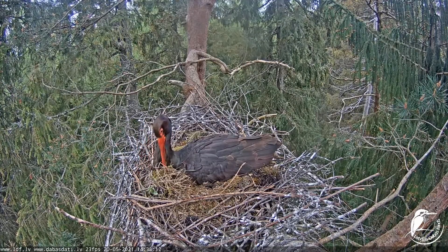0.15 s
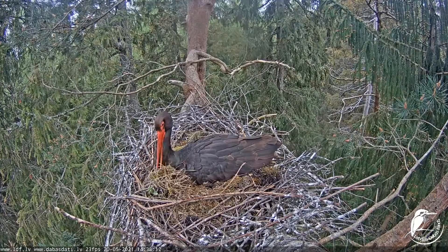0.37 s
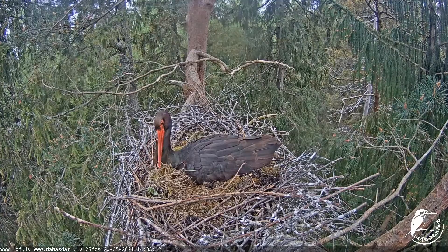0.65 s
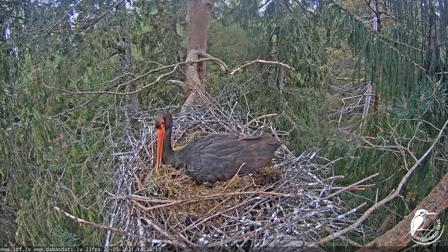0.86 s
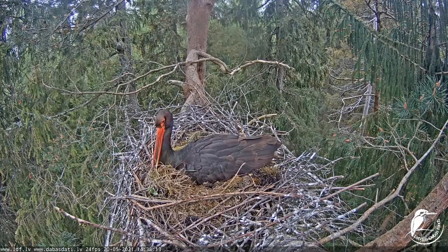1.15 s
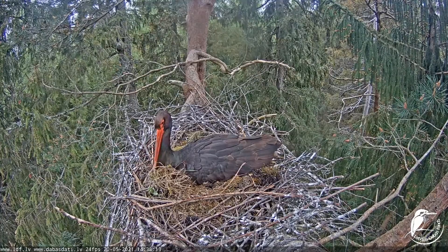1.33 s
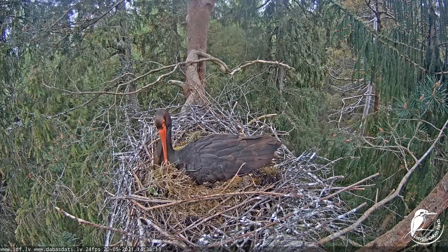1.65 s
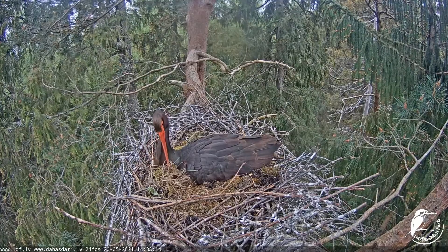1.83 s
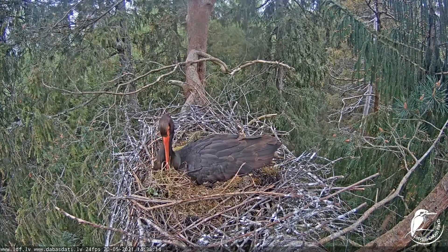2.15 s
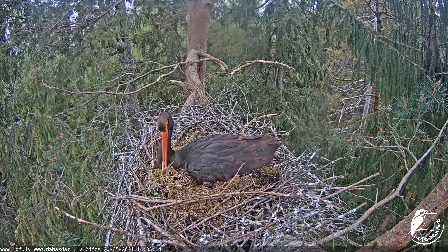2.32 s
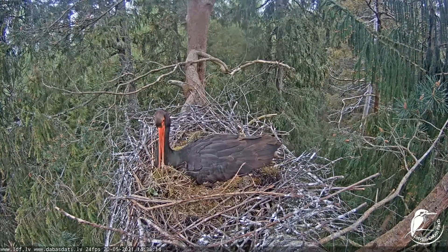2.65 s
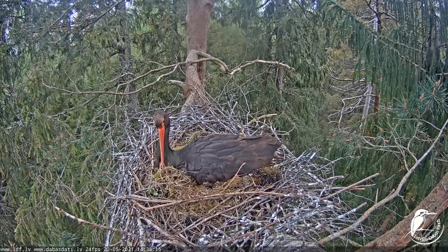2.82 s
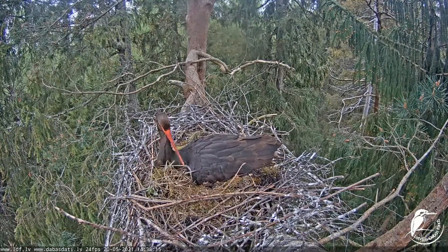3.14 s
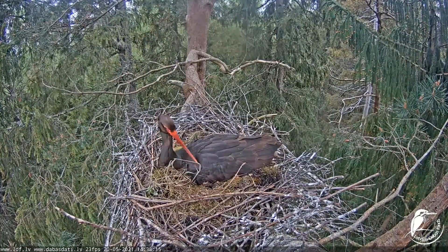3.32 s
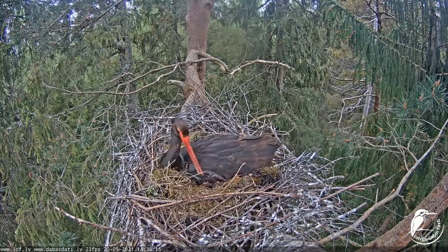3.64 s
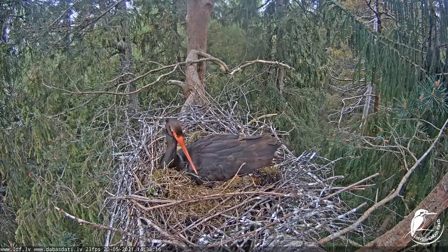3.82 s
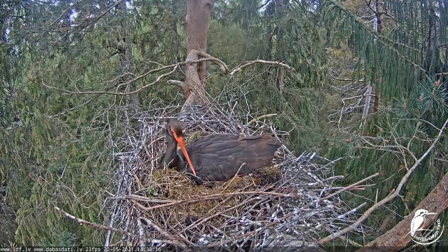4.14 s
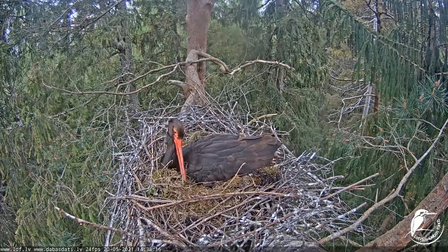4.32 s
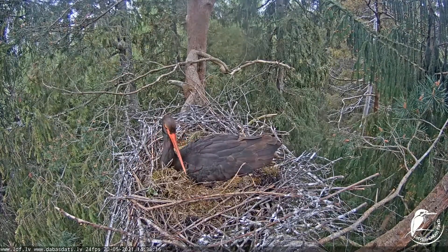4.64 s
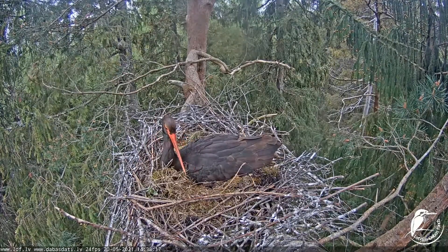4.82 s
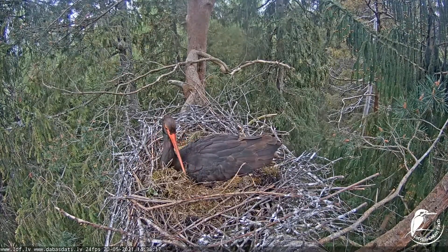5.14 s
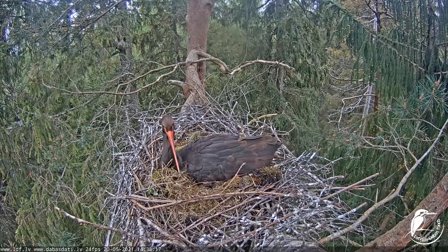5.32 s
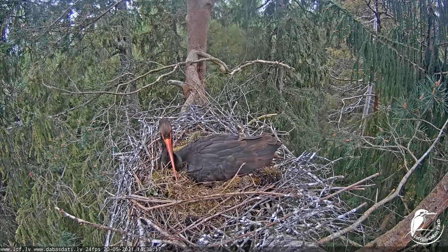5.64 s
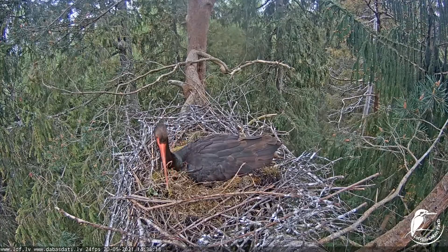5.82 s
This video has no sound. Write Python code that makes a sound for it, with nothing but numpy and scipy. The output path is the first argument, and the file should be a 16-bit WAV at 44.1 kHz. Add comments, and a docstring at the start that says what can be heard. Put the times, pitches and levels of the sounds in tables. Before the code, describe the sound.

Quiet forest ambience with a low uneven rumble and soft hiss, faint distant twittering, and small birds giving short whistles and chirps.

```python
"""Quiet forest from high in a tree

A low rumble swells and fades under smooth hiss with a hump near 2-3 kHz, the blurred chorus of far
songbirds: both are coloured noise, the rumble with narrow noise bands on set pitch and level curves.
Far twitter, nearer whistles and chirps are fluttering sines with sparse echoes from the trunks; two twig
snaps are ringing wood modes. A cheap microphone input adds a constant offset and one brief dropout."""
import sys
import numpy as np
from scipy import signal
from scipy.io import wavfile
from scipy.ndimage import uniform_filter1d

SR = 44100
rng = np.random.default_rng(int(sys.argv[2]) if len(sys.argv) > 2 else 0)


def store_pcm(level_fs):
    """Save levels as 16-bit WAV."""
    pcm = np.round(np.clip(level_fs, -1, 1) * 32767).astype(np.int16)
    wavfile.write(sys.argv[1], SR, np.atleast_2d(pcm).T)


def elevation(decibels):
    """Turn decibel levels (scalar or array-like) into linear amplitude ratios."""
    levels = np.asarray(decibels, float)
    return 10 ** (levels / 20)


N = 263718  # length in samples


def evened(x):
    """Scales to rms 1."""
    return x / np.sqrt(np.mean(x ** 2) + 1e-20)


def add(mix, start_s, sound):
    """Mixes a sound in at a time, cut off at the end of the mix."""
    part = mix[round(start_s * SR):][:len(sound)]
    part += sound[:len(part)]


def along(rows):
    """A level curve of (s, dB) as a gain for every sample."""
    s, db = np.transpose(rows)
    return elevation(np.interp(np.arange(N) / SR, s, db))


def noise(spectrum, size, patchy_db, patch_bins, patch_frames):
    """Random short-time spectra of a given colour, with drifting louder and softer patches; rms 1."""
    frames = 4 * N // size + 5
    bin_hz = np.fft.rfftfreq(size, 1 / SR)
    real, imag, patches = rng.standard_normal((frames, len(bin_hz), 3)).T
    patches = uniform_filter1d(patches, patch_bins, axis=0)
    patches = evened(uniform_filter1d(patches, patch_frames, axis=1))
    hz, db = np.transpose(spectrum)
    colour_db = np.interp(np.log(bin_hz + 1), np.log(hz + 1), db)[:, None]
    spectra = (real + 1j * imag) * elevation(colour_db + patchy_db * patches)
    _, sound = signal.istft(spectra, nperseg=size, noverlap=3 * size // 4)
    return evened(sound[:N])


def tone(hz, rough, flutter_hz):
    """A sine on a pitch curve whose level and phase flutter; fully rough, it is a narrow band of noise."""
    settling = 2000  # samples for the filter to settle, thrown away
    real, imag = rng.standard_normal((len(hz) + settling, 2)).T
    lowpass = signal.butter(2, flutter_hz, fs=SR, output="sos")
    flutter = signal.sosfilt(lowpass, real + 1j * imag)[settling:]
    flutter /= np.sqrt(np.mean(abs(flutter) ** 2))
    carrier = np.exp(2j * np.pi * np.cumsum(hz) / SR)
    return ((1 - rough + rough * flutter) * carrier).imag


def rumble():
    """Lumpy low noise, and narrow noise bands with set pitch and level curves plus a slight random wander."""
    # colour of the low noise, relative: f/Hz, density/dB per Hz
    low_colour = [(15, -31.5), (25, -8), (27, -4), (32, -3), (125, -5.5), (193, -7.5), (450, -28.5),
                  (580, -68.5), (990, -120)]
    # its swell, before a trim of -4.5 dB: t/s, level/dB
    swell = [(0, -47.5), (.8, -47), (1.9, -45.5), (3.3, -50), (3.9, -45), (4.3, -49), (5.2, -50.5),
             (5.55, -42.5), (5.98, -47.5)]
    # set curves, one list for each narrow band: t/s, centre f/Hz, level/dB (a slight wander is added)
    drones = [
        [(0, 112, -51), (.2, 113, -46), (.6, 118, -52), (1.4, 128, -51), (1.9, 127, -46), (2.4, 126, -47.5),
         (3.2, 122, -56), (4.3, 100, -62), (4.8, 104, -51.5), (5.25, 122, -56), (5.6, 129, -46.5),
         (5.98, 126, -55.5)],
        [(0, 197, -53), (.3, 196, -54), (.55, 194, -55.5), (1, 192, -47.5), (1.15, 181.8, -54),
         (1.4, 168, -55.5), (3.2, 178, -58), (3.95, 182, -52), (4.2, 178, -61.5), (5.6, 158, -50.5),
         (5.98, 162, -57.5)],
        [(0, 46.03, -52), (.5, 53.87, -49.5), (1, 56, -56.5), (3.5, 56.74, -53.5), (4.8, 53, -59),
         (5.98, 50.79, -54.5)],
        [(0, 81.7, -52.5), (.75, 78.43, -52), (1.3, 85.46, -52), (1.9, 85.87, -54), (3, 84.43, -53),
         (4.3, 84.17, -59.5), (5.3, 84, -56), (5.98, 84.25, -66)],
        [(0, 254.7, -60.5), (2, 255.3, -64), (2.4, 254.9, -56), (3.4, 256, -63.5), (4, 253.9, -59),
         (5.2, 255, -59.5), (5.5, 255.3, -53), (5.98, 254.2, -59.5)],
    ]
    # nominal width of each narrow band: f/Hz
    drone_widths = [26.5, 25.73, 19.4, 18.2, 51.9]
    wander_db, slowest_hz, fastest_hz = 1.5, .4, 2.5  # slight random wander of level: rms and rates
    t = np.arange(N) / SR
    low_noise = noise(low_colour, size=4096, patchy_db=1.5, patch_bins=3, patch_frames=8)
    out = along(swell) * elevation(-4.5) * low_noise
    for rows, width_hz in zip(drones, drone_widths):
        s, hz, db = np.transpose(rows)
        rates_hz = np.geomspace(slowest_hz, fastest_hz, 12)
        wander = evened(sum(np.sin(2 * np.pi * (rate * t + rng.random())) for rate in rates_hz))
        band = evened(tone(np.interp(t, s, hz), rough=0.929, flutter_hz=width_hz / 2))
        out += elevation(np.interp(t, s, db) + wander_db * wander) * band
    return out


def air():
    """Steady air, far chorus and microphone hiss as one smooth noise with a hump near 2-3 kHz."""
    # colour, relative: f/Hz, density/dB per Hz
    air_colour = [(180, -20.5), (300, -3), (373, -6.5), (485, -8.5), (630, -9), (859, -12), (1190, -14.5),
                  (1640, -14.5), (2240, -7.5), (2830, -13.5), (3790, -22.5), (11600, -25), (12100, -26),
                  (15700, -57.5), (22000, -120)]
    level_db = -55.5  # rms
    return elevation(level_db) * noise(air_colour, size=1024, patchy_db=0.8378, patch_bins=8, patch_frames=10)


def twitter():
    """Many faint, hoarse glides from birds too far away to tell apart, livelier at some times."""
    # how lively the far birds are, as a gain on all of them: t/s, level/dB
    lively = [(0, 0), (1.5, 14.5), (3, 13.5), (4, 4.5), (5.98, -13)]
    out = np.zeros(N)
    for place, length, pitch, glide, softness in rng.random((150, 5)):
        count = round((0.02274 + 0.0367 * length) * SR)
        start_hz = 1850 + 1900 * pitch ** 1.6
        hz = start_hz * np.linspace(1, .88 + 0.2453 * glide, count)
        db = -66 - 8 * pitch - 5 * softness  # higher notes lose more on the way
        note = np.hanning(count) * tone(hz, rough=0.41, flutter_hz=120)
        add(out, place * N / SR, elevation(db) * note)
    return along(lively) * out


def glides(rows, rough, flutter_hz):
    """Short notes that slide straight from one pitch to another, with soft ends and a flutter."""
    out = np.zeros(N)
    for start_s, length_s, start_hz, end_hz, db in rows:
        count = round(length_s * SR)
        hz = np.linspace(start_hz, end_hz, count)
        note = np.sqrt(.5) * evened(tone(hz, rough, flutter_hz))  # the rms of a sine of peak 1
        add(out, start_s, elevation(db) * signal.windows.tukey(count, .6) * note)
    return out


def whistles():
    """Held notes that settle in pitch, pulse, and fall to a soft tail."""
    # rms level at the loudest moment, before the pulsing:
    # t/s, length/s, start f/Hz, settled f/Hz, level/dB, share of flutter (0-1)
    held_notes = [(1.025, .5, 2090, 2180, -52, .28), (2.19, .46, 2260, 2300, -58, .6),
                  (3.9, .72, 3240, 3050, -61, .36), (4.27, .27, 3275, 3255, -69, .4),
                  (5.86, .2, 2330, 2330, -59, .45)]
    settle, peak_at, tail_at = .12, .37, .46  # shares of the length: settling time, loudest, tail begins
    start_db, tail_db, end_db = -6, -7, -12  # against the loudest moment
    throb_hz, throb_depth = 24, .35  # the held note pulses
    out = np.zeros(N)
    for start_s, length_s, start_hz, settled_hz, db, rough in held_notes:
        t = np.arange(0, length_s, 1 / SR)
        hz = settled_hz + (start_hz - settled_hz) * np.exp(-t / (settle * length_s))
        note = evened(tone(hz, rough, flutter_hz=90))
        shape_db = np.interp(t / length_s, [0, peak_at, tail_at, 1], [start_db, 0, tail_db, end_db])
        throb = 1 - throb_depth * np.cos(2 * np.pi * throb_hz * t)
        add(out, start_s, elevation(db + shape_db) * throb * note * signal.windows.tukey(len(t), .1))
    return out


def birds():
    """Nearer whistles and short glides, fluttering as many paths through the leaves interfere."""
    # the clearest short chirps, level as the peak of a steady sine:
    # t/s, length/s, start f/Hz, end f/Hz, level/dB
    chirps = [(.71, .045, 2220, 2190, -55.5), (.88, 0.035, 2420, 2512, -56.5),
              (1.876, 0.0354, 2164, 2389, -56), (1.969, 0.0408, 2580, 2800, -61),
              (2.018, 0.043, 3110, 3122, -66.5), (2.04, 0.05, 2050, 2090, -59.5),
              (2.073, .022, 2640, 2913, -64), (2.97, .061, 2600, 2550, -59),
              (3.028, .027, 2389, 2972, -54.5), (3.07, 0.016, 2627, 2352, -51),
              (3.71, 0.053, 2700, 2890, -57), (3.34, 0.049, 2510, 3183, -59),
              (3.638, 0.0496, 3408, 3210, -63), (3.68, .03, 2660, 2340, -57),
              (3.989, .042, 2245, 2205, -52.5), (4.46, 0.079, 4190, 3775, -68.5),
              (4.63, 0.0286, 2071, 2432, -54), (4.64, .087, 4054, 3800, -71),
              (4.862, .027, 2672, 2107, -51.5), (4.899, .055, 1867, 1750, -59.5),
              (4.91, 0.054, 3575, 3875, -67.5), (4.995, .036, 2042, 2484, -51),
              (5.094, 0.0616, 3625, 3795, -67), (5.217, .04, 2825, 3275, -60),
              (5.248, 0.0315, 3280, 2925, -60), (5.269, .04, 3770, 3740, -62.5),
              (5.39, 0.0606, 1945, 1775, -61), (5.425, .072, 3297, 3505, -64.5),
              (5.49, 0.107, 2420, 2327, -57.5), (5.54, 0.071, 3585, 2725, -58.5),
              (5.663, 0.064, 3250, 3487, -64.5), (5.76, 0.0406, 3300, 2754, -58.5),
              (5.8, 0.0424, 3478, 3455, -62), (5.89, .045, 3380, 3460, -65)]
    # hoarse, blurred notes, same columns: t/s, length/s, start f/Hz, end f/Hz, level/dB
    rasps = [(1.433, 0.11, 3340, 3487, -63.5), (2.47, .059, 3275, 3280, -61.5),
             (2.542, .04, 3400, 3079, -61), (3.66, 0.09, 3480, 3700, -64), (3.195, .077, 2000, 2143, -58),
             (3.81, 0.0642, 2480, 2262, -52.5), (4.174, 0.06154, 2775, 2668, -55),
             (4.239, 0.0388, 2837, 2620, -57), (4.685, .115, 3475, 3275, -64)]
    clear = glides(chirps, rough=.22, flutter_hz=90)
    hoarse = glides(rasps, rough=.65, flutter_hz=230)
    return whistles() + clear + hoarse


def trunks(x, t60=0.45):
    """Scattered echoes from the trees: sparse taps of random sign that die away by 60 dB in t60 seconds."""
    first, spacing = 400, 22  # samples: delay before the first echo, one echo in each slot
    taps = np.zeros(SR)
    at = np.arange(first, SR - spacing, spacing)
    signs = rng.choice([-1., 1.], len(at))
    taps[at + rng.integers(0, spacing, len(at))] = signs * elevation(-60 * at / SR / t60)
    return signal.fftconvolve(x, taps / np.linalg.norm(taps))[:N]


def twigs():
    """A crack and a second one three milliseconds later, with crackle around, ring the modes of dry wood."""
    # the snaps: t/s, peak level/dB
    snaps = [(2.4935, -42), (2.802, -38.5)]
    # modes of the wood, levels relative: f/Hz, level/dB, time to fall 60 dB/s
    wood_modes = [(800, -9, .015), (1450, -8, .014), (1950, -5, .012), (2500, 0, .016), (2900, -2, .014),
                  (3500, -9, .01)]
    out = np.zeros(N)
    t = np.arange(1000) / SR
    ring = sum(elevation(db - 60 * t / t60) * np.sin(2 * np.pi * hz * t) for hz, db, t60 in wood_modes)
    ring *= 1 - np.exp(-t / .0003)  # soft onset keeps the treble down
    for start_s, db in snaps:
        crackle = .25 * rng.standard_normal(160) * (rng.random(160) < .05)
        crackle[[0, 135]] = 1, -.45  # the two cracks
        snap = np.convolve(crackle, ring)
        add(out, start_s, elevation(db) * snap / abs(snap).max())
    return out


def scene():
    """All sources at one microphone; only the birds are echoed by the trunks."""
    background = rumble() + air()
    song = twitter() + birds()
    echoes = elevation(-6) * trunks(song)
    return (background + song + echoes + twigs())[None]


def top_cut(x):
    """Nothing passes above the cut-off."""
    return signal.sosfilt(signal.butter(12, 13210, fs=SR, output="sos"), x)


def record(dry):
    """A cheap microphone input: steep band limit, constant offset, and a gap of four milliseconds."""
    edge_hz, offset = 12150, .0126  # upper limit of the input; constant voltage, full scale 1
    gap_start, gap_end = 2.6275, 2.6315  # the signal is lost between these times (s)
    lowpass = signal.firwin(511, edge_hz, window=("kaiser", 9), fs=SR)
    limited = signal.oaconvolve(dry, lowpass[None], "same")
    t = np.arange(N) / SR
    live = (t < gap_start) | (t > gap_end)
    heard = (limited + offset) * live  # the offset drops out too
    return top_cut(heard)


dry = scene()
out = record(dry)
store_pcm(out)
```